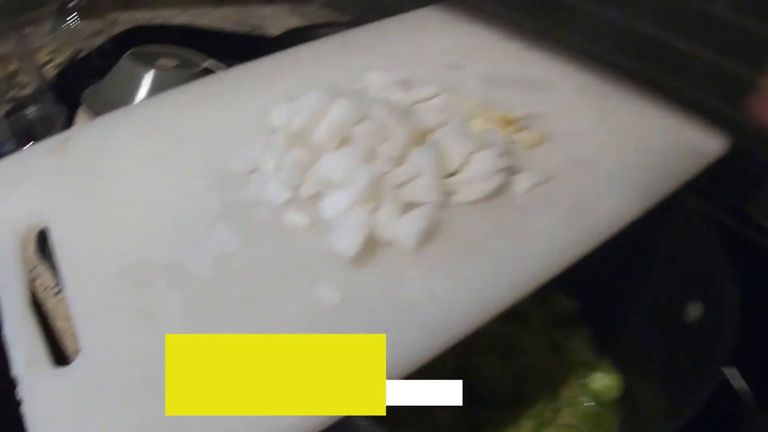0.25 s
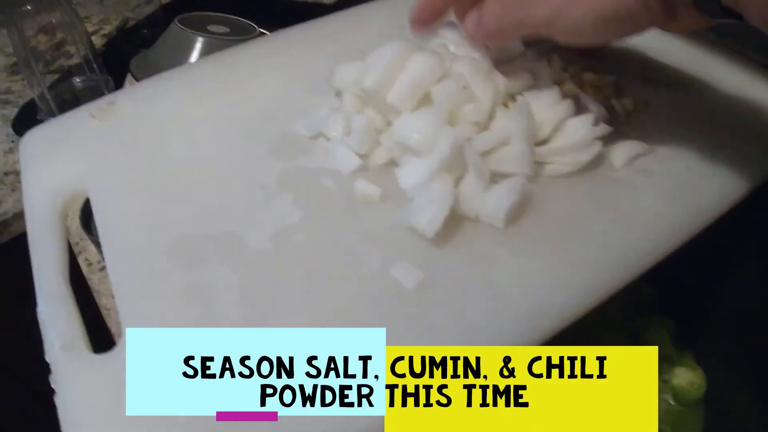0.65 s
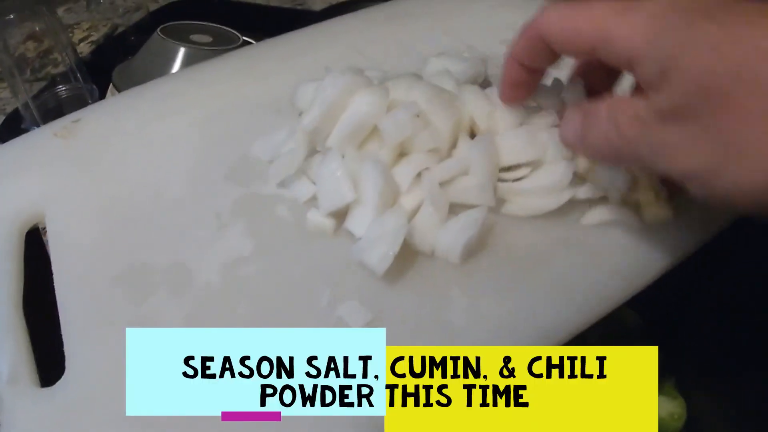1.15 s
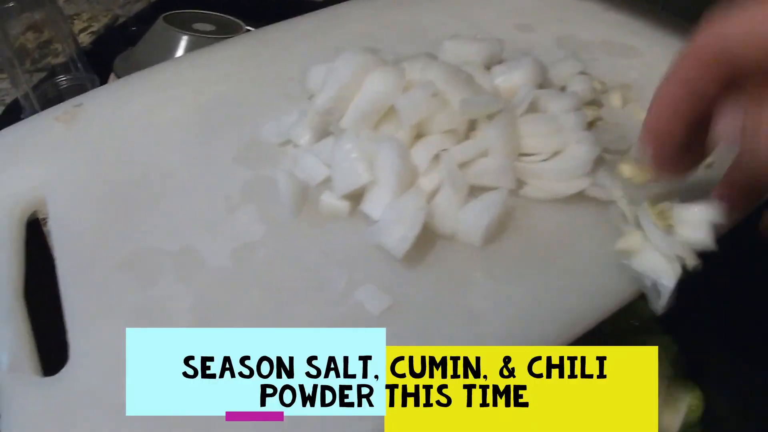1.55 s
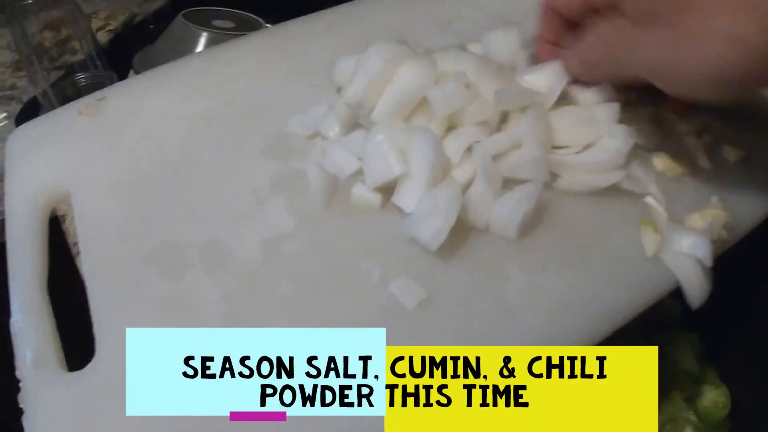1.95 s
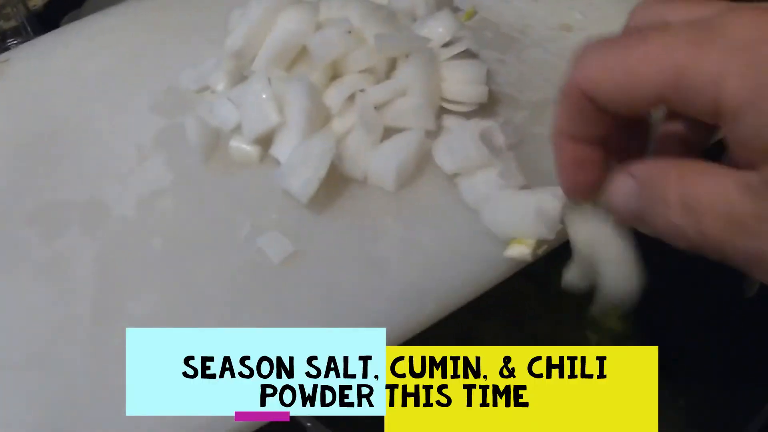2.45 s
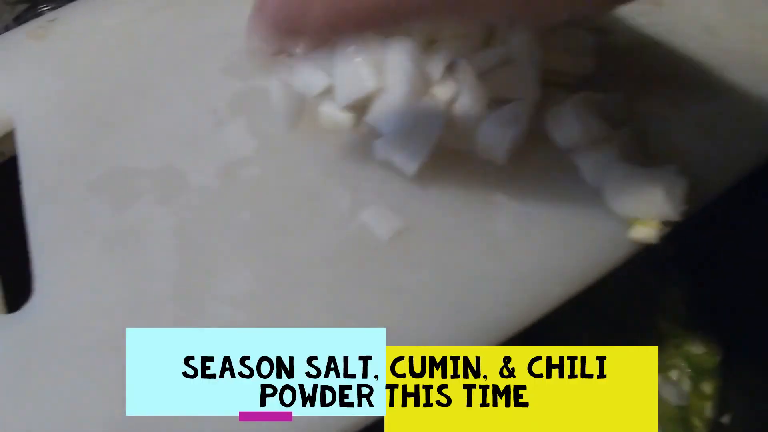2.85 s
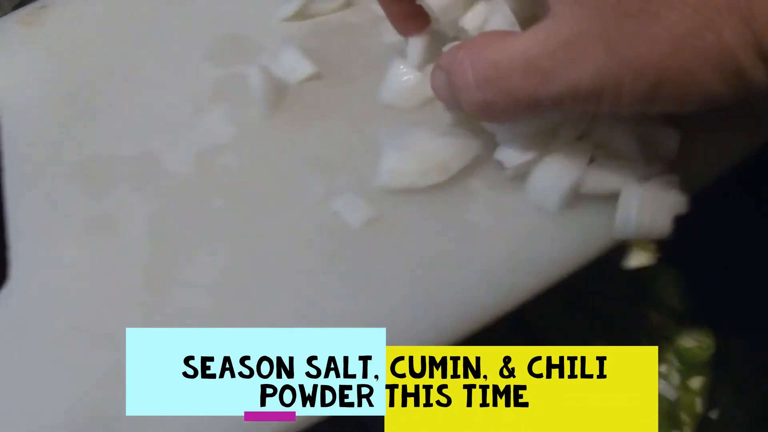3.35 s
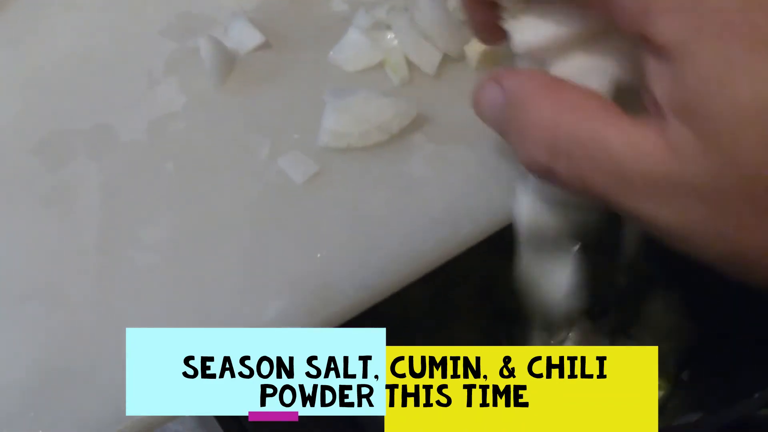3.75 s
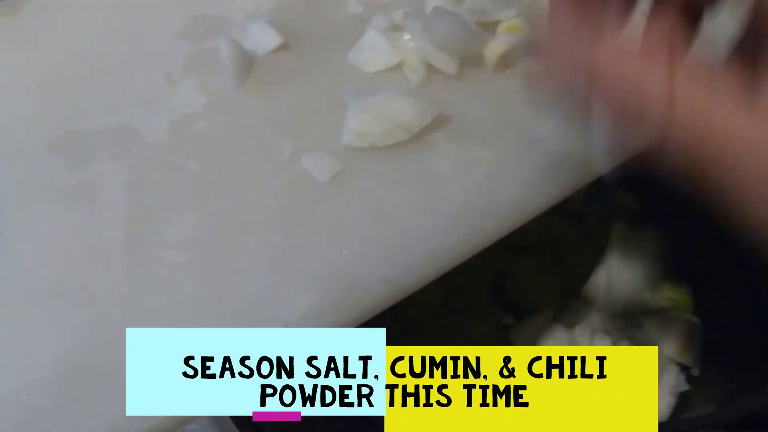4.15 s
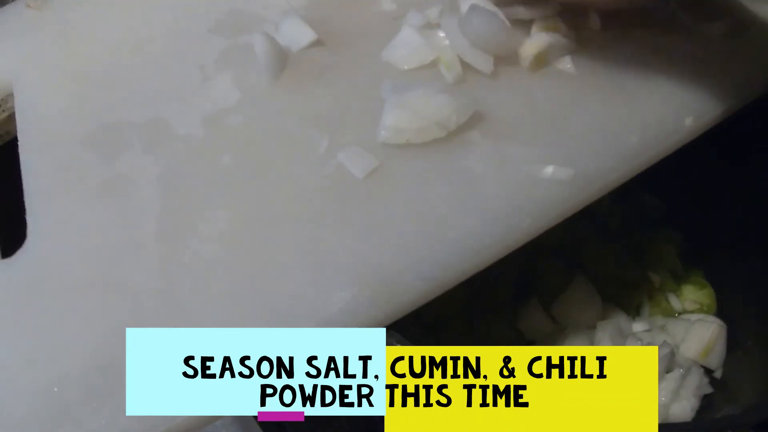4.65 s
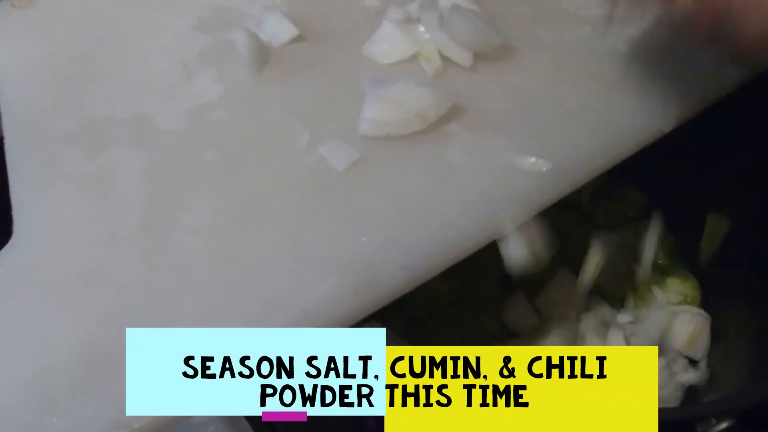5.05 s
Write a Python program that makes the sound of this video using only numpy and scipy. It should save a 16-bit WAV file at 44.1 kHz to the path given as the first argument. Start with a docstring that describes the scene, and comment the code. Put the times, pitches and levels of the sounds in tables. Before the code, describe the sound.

Hollow plastic scrapes and knocks, wet pieces plopping onto vegetables in a steel pot, a faint ping, then a loud rubbing groan.

```python
"""A plastic cutting board drones as chopped onion and garlic are pushed off it by hand into a steel pot:
random slips and shoves excite its resonances, and two rubs of the hand add a gliding groan and squeak.
Clumps plop on the vegetables below (noise bursts through pot resonances), wet faces tick apart,
and a few pieces ping on the bare pot wall (decaying sines). Fingertips tap the plastic;
a small kitchen adds reflections, soft room noise and a low hum."""
import sys
import numpy as np
from scipy import signal
from scipy.fft import rfft, irfft, next_fast_len
from scipy.io import wavfile
from scipy.ndimage import uniform_filter1d

SR = 44100
rng = np.random.default_rng(int(sys.argv[2]) if len(sys.argv) > 2 else 0)


def unload_audio(sound):
    """Save the sound as a 16-bit wav file, at the path given as the first command line argument."""
    columns = np.transpose(np.atleast_2d(sound))
    # keep every value between -1 and 1, then stretch to whole-number steps
    steps = np.round(np.clip(columns, -1, 1) * 32767)
    wavfile.write(sys.argv[1], SR, steps.astype(np.int16))


N = 233156
TIME_S = np.arange(N) / SR

# whole board flexing in the hand: centre_hz, width_hz, level_db
FLEX_MODES = [(85, 150, -3.5), (124.1, 4, 8.5), (155, 3.3, 18), (190.5, 9.6, 7.5)]
# stiffer bending resonances of the board: centre_hz, width_hz, level_db
UPPER_MODES = [(342, 62, 22.5), (399, 20, 25), (440.6, 48, 25), (524, 17, 12), (863.5, 21.5, 27.5),
               (1235, 37, 9), (1260, 230, 2), (2000, 1500, -13), (2700, 1100, -36)]
# spectrum of the juice film's hiss: frequency_hz, density_db_per_hz
WET_SPECTRUM = [(300, -33.5), (700, -1.5), (1100, -8.5), (2000, 0), (4000, 0.5), (4900, -5), (6100, -2),
                (7200, -10), (10000, -12), (11200, -26.5), (14000, -28), (15500, -45)]
# spectrum of splashes and juice spray: frequency_hz, density_db_per_hz
SPLASH_SPECTRUM = [(800, -47), (2500, -1.5), (4500, 2.5), (6200, 4.5), (7500, -4), (10000, -8.5),
                   (12000, -22), (15000, -30)]


def from_db(db):
    """Decibels to gain."""
    return 10 ** (np.asarray(db) / 20)


def rms_one(x):
    """Scale to rms 1."""
    return x / np.sqrt(np.mean(x ** 2) + 1e-20)


def envelope(x, size):
    """Running rms over size samples."""
    return np.sqrt(np.abs(uniform_filter1d(x ** 2, size)) + 1e-14)


def even(x):
    """Hold the level at 1 and keep the fast grain."""
    return x / envelope(x, size=2200)


def colour(x, spectrum):
    """Filter by (Hz, dB) points, interpolated over log frequency."""
    hz, db = np.transpose(spectrum)
    size = next_fast_len(len(x))
    bins_hz = np.maximum(np.arange(size // 2 + 1) * SR / size, 1)
    gain = from_db(np.interp(np.log(bins_hz), np.log(hz), db))
    return irfft(rfft(x, size) * gain, size)[:len(x)]


def resonate(x, hz, width_hz):
    """Two-pole resonance with gain 1 on top."""
    r = np.exp(-np.pi * width_hz / SR)
    zeros = np.array([1, 0, -1]) * (1 - r * r) / 2
    poles = [1, -2 * r * np.cos(2 * np.pi * hz / SR), r * r]
    return signal.lfilter(zeros, poles, x + 1e-18)


def body(x, modes, scatter_db=0):
    """Parallel resonances; the place of contact changes their strengths by scatter_db."""
    return sum(from_db(db + scatter_db * rng.normal()) * resonate(x, hz, width_hz)
               for hz, width_hz, db in modes)


def soften(x, hz):
    """Second-order low-pass."""
    return signal.sosfilt(signal.butter(2, min(hz, SR / 2 - 1000), fs=SR, output="sos"), x)


def drift(hz):
    """Random wavering below about hz, with rms 1."""
    return rms_one(soften(rng.standard_normal(N + SR), hz)[SR:])


def glide(x, ratio):
    """Raise or lower a steady texture's pitch by a moving ratio."""
    return np.interp(np.cumsum(ratio) % N, np.arange(N), x)


def grains(per_s, spread_db, size=N):
    """Tiny slips at random moments, a few much stronger than the rest."""
    strength = from_db(spread_db * np.minimum(rng.exponential(1, size), 4))
    happens = rng.random(size) < per_s / SR
    return happens * strength * rng.choice([-1, 1], size)


def gate(start_s, end_s, rise_s, fall_s):
    """Full level from start to end, rising exponentially before and dying away after."""
    rise, fall = (TIME_S - start_s) / rise_s, (end_s - TIME_S) / fall_s
    return np.exp(np.minimum(0, np.minimum(rise, fall)))


def add(track, s, sound, db):
    """Mix in a short sound at time s, its highest 5 ms rms at db."""
    start = round(s * SR)
    sound = from_db(db) * sound / envelope(sound, size=220).max()
    track[start:start + len(sound)] += sound[:N - start]


def background():
    """Room tone is coloured noise; the low hum is a sine plus narrow-band noise, so it wavers."""
    # room noise spectrum: frequency_hz, density_db_per_hz
    room_tone = [(15, -3), (28, -1), (50, -5), (80, -17), (150, -4), (250, -5), (420, -17), (1000, -23.5),
                 (2200, -23.3), (4000, -25.3), (6200, -24.3), (9000, -33), (11500, -48), (15000, -64)]
    room_rms_db, hum_rms_db, hum_hz = -53.8, -56, 50.1
    room = rms_one(colour(rng.standard_normal(N), room_tone))
    waver = rms_one(resonate(rng.standard_normal(N), hum_hz, width_hz=6.8))
    hum = rms_one(np.sin(2 * np.pi * hum_hz * TIME_S) + 0.52 * waver)
    return from_db(room_rms_db) * room + from_db(hum_rms_db) * hum


def taps():
    """A soft fingertip brushes the plastic: a short, dull noise band plus the board's flexing."""
    # fingertip taps: start_s, level_db, pitch_hz, decay_s
    touches = [(0.374, -50, 1150, 0.03), (0.731, -43.5, 880, 0.02), (1.421, -31, 470, 0.006),
               (1.841, -37, 890, 0.003), (1.99, -34, 1400, 0.012), (1.992, -33, 500, 0.04),
               (4.476, -49, 833, 0.0092), (4.657, -33, 500, .016), (5.135, -43, 380, .025)]
    out, age_s = np.zeros(N), TIME_S[:SR // 5]
    for s, db, hz, decay_s in touches:
        shape = np.exp(-age_s / decay_s) * (1 - np.exp(-age_s / 0.0013))
        touch = shape * rng.standard_normal(len(age_s))
        add(out, s, soften(resonate(touch, hz, width_hz=.7 * hz), hz), db)
        add(out, s, soften(body(touch, FLEX_MODES), hz=400), db - 7)
    return out


def slide_gains():
    """Along each push the drone starts a little strong and settles, the juice film thins and the rumble grows
    toward the edge."""
    # pushes: start_s, end_s, drone_db, start_hiss_db, start_fizz_db, end_rumble_db (before the mix gains)
    slides = [(0.968, 1.368, -47.5, -63.5, -72, -71), (1.448, 1.54, -51.5, -68, -83, -71),
              (1.841, 1.99, -44, -69, -62.5, -58), (2.149, 2.268, -45.5, -80, -49.5, -57),
              (2.313, 2.44, -45, -98, -63.5, -47.5), (2.54, 2.632, -54, -66.5, -80, -48),
              (3.155, 3.227, -47.5, -58.5, -59, -67), (3.269, 3.448, -42, -61, -65, -50),
              (3.549, 3.942, -44, -63, -61.5, -38), (4.027, 4.235, -52.5, -65, -79, -34.5)]
    gather_s, gather_db = 0.021, -2  # negative: the drone starts 2 dB up and settles
    gather_s, gather_db = 0.021, -2
    fade_db_per_s, growth_db_per_s = 1.5, 41
    total = 0
    for start_s, end_s, drone_db, hiss_db, fizz_db, rumble_db in slides:
        age_s = np.clip(TIME_S, start_s, end_s) - start_s
        levels_db = [drone_db - gather_db * np.exp(-age_s / gather_s),
                     hiss_db - fade_db_per_s * age_s,
                     fizz_db - fade_db_per_s * age_s,
                     rumble_db - growth_db_per_s * (end_s - start_s - age_s)]
        total = total + gate(start_s, end_s, rise_s=0.038, fall_s=0.045) * from_db(levels_db)
    return total


def board_low(x, edge_hz):
    """Soft contacts reach only the board's low resonances."""
    # board resonances: centre_hz, width_hz, level_db
    board = [(173, 46, -14), (260, 20, 15), (278, 12, 21), (342, 69, 2), (452, 40, 7)]
    return soften(soften(body(x, board), edge_hz), edge_hz)


def board_drone(ratio):
    """Dense slips keep the board sounding; hand pressure bends its pitch by a ratio."""
    return even(glide(board_low(grains(per_s=2500, spread_db=6.0), edge_hz=554), ratio))


def sliding():
    """The heap slides in small jerks: the board drones and rumbles, and the film of juice crackles."""
    # overtones that sliding pieces wake in the board: centre_hz, width_hz, level_db
    slide_tones = [(365, 60, 0), (480, 50, -1), (885, 35, -9), (1380, 55, -17)]
    drone_gain, hiss_gain, fizz_gain, rumble_gain = slide_gains()
    low = board_drone(1 + .07 * drift(hz=12)) * from_db(2 * drift(hz=24.0))
    overtone = rms_one(body(grains(per_s=900, spread_db=4), slide_tones))
    handling = even(soften(body(rng.standard_normal(N), FLEX_MODES), hz=223))
    crackle = even(colour(grains(per_s=9000, spread_db=4.2), WET_SPECTRUM))
    crackle = crackle * from_db(1.7 * drift(hz=13))
    spray = even(colour(grains(per_s=5000, spread_db=3.5), SPLASH_SPECTRUM))
    spray = spray * from_db(2 * drift(hz=5.5))
    drone = drone_gain * (low + from_db(-9.5) * overtone)
    rumble = from_db(-4.5) * rumble_gain * handling
    hiss = from_db(5.5) * hiss_gain * crackle
    return drone + rumble + hiss + fizz_gain * spray


def knocks():
    """A shove swings the board, its pitch sagging until the wet heap damps it; weight gives a thud."""
    # shoves by fingers and clumps: start_s, level_db, mid_sag_pitch_hz, decay_s
    shoves = [(0.985, -44, 298, 0.041), (1.099, -44.5, 318, 0.051), (1.158, -41.5, 289, 0.057),
              (1.298, -36, 268, 0.041), (1.422, -26, 294, 0.013), (1.459, -38, 286, 0.026),
              (1.486, -33.5, 288, 0.031), (1.601, -40, 291, 0.017), (1.652, -39.5, 303, 0.024),
              (1.724, -30, 286, 0.026), (1.843, -30.5, 287, 0.015), (1.887, -28.5, 269, 0.024),
              (2.272, -28, 267.5, 0.043), (2.514, -36.5, 285, 0.017), (2.556, -31.5, 280, 0.019),
              (2.67, -41.5, 285.5, 0.028), (2.803, -37, 276, 0.015), (3.335, -33, 327, 0.0058),
              (3.41, -28.5, 269.6, 0.025), (3.564, -39, 265, 0.033), (3.658, -33, 263, 0.024),
              (3.733, -27, 263.3, 0.065), (3.849, -31.5, 266.6, 0.042), (3.905, -29, 271, 0.04),
              (3.976, -33, 270, 0.017), (4.051, -27, 268, 0.018), (4.08, -25.5, 270, 0.022),
              (4.129, -26.5, 284, 0.023), (4.184, -20, 282.6, 0.014), (4.341, -40.5, 283, 0.022),
              (5.088, -41, 257, 0.067)]
    # the hand's weight comes down on the board: start_s, level_db
    weights = [(1.962, -32), (2.716, -36), (3.76, -34), (4.141, -35), (4.663, -26.5), (4.707, -33.5),
               (5.137, -38.5)]
    sag, fade_power = .09, 1.6  # pitch sag as a share; how abruptly the swing dies
    clack_db, thud_db = -16, -18.5
    out, age_s = np.zeros(N), TIME_S[:SR // 5]
    push = signal.unit_impulse(len(age_s))
    thud = soften(body(push, FLEX_MODES), hz=232)
    for s, db, hz, decay_s in shoves:
        spent = age_s / max(decay_s, .005)
        phase = 2 * np.pi * np.cumsum(hz * (1 + sag * (np.exp(-spent) - .5))) / SR
        swing = np.exp(-spent ** fade_power) * (1 - np.exp(-age_s / 0.0024)) * np.sin(phase)
        clack = soften(body(push, UPPER_MODES, scatter_db=3), hz=480)
        add(out, s, rms_one(swing) + from_db(clack_db) * rms_one(clack), db)
        add(out, s, thud, db + thud_db)
    for s, db in weights:
        add(out, s, thud, db)
    return out


def ticks():
    """A film of juice breaks as wet faces snap apart, and a firm piece cracks on the steel wall at 1.777 s: a
    short, bright spit of band-passed grains."""
    # snaps: start_s, level_db, pitch_hz (the row at 1.777 s is the crack of a piece hitting the steel)
    snaps = [(1.14, -48, 5500), (1.211, -50.5, 5800), (1.304, -45.5, 5900), (1.477, -51.5, 5760),
             (1.645, -63, 5400), (1.777, -36, 5000), (1.982, -52, 6700), (2.061, -49.5, 5230),
             (2.391, -42, 3180), (2.5, -49, 3040), (2.534, -47, 5100), (2.555, -53, 3800),
             (2.74, -48, 3720), (3.103, -55, 6700), (3.307, -64, 3220), (3.614, -48, 4000),
             (3.662, -44.5, 3630), (4.051, -44.5, 6030), (4.067, -40.5, 3560), (4.095, -48, 7600),
             (4.194, -49.5, 8000), (4.342, -41, 5300), (4.692, -47, 5700)]
    decay_s, width_share = 0.01, 0.22  # bandwidth as a share of pitch
    out, age_s = np.zeros(N), TIME_S[:SR // 10]
    for s, db, hz in snaps:
        spit = np.exp(-age_s / decay_s) * grains(per_s=16000, spread_db=2, size=len(age_s))
        add(out, s, soften(resonate(spit, hz, width_hz=width_share * hz), hz=1.15 * hz), db)
    return out


def squash(decay_s, per_s):
    """A soft piece meets the heap gradually and flattens in a lumpy burst of small contacts."""
    attack_s = 0.0045
    age_s = TIME_S[:SR // 5]
    lumps = from_db(1.4 * rms_one(soften(rng.standard_normal(len(age_s)), hz=160)))
    shape = np.exp(-age_s / max(decay_s, .001)) * (1 - np.exp(-age_s / attack_s)) ** 2
    return shape * lumps * grains(per_s, spread_db=3.0, size=len(age_s))


def plops():
    """Each landing piece, and one wet squish at 1.274 s, gives its own dull note, the pot's hollow and a wet
    splash."""
    # larger pieces and clumps, plus one wet squish at 1.274 s: start_s, level_db (before plop_db), pitch_hz,
    # splash_db, decay_s
    pieces = [(1.274, -49, 5540, -46.5, 0.01), (1.64, -45, 1870, -50, 0.0043),
              (1.66, -35.5, 890, -55, 0.0035), (1.677, -44.5, 1900, -65, 0.0056),
              (1.724, -33, 1900, -47.5, 0.0059), (1.883, -34.5, 1750, -43, 0.0024),
              (1.924, -36, 2900, -46, 0.001), (2.009, -37, 875, -43.5, 0.0038),
              (2.388, -28, 1880, -47, 0.0014), (2.442, -41.5, 876, -67, 0.0045),
              (2.451, -37.5, 2140, -58, 0.0025), (2.47, -35.5, 1960, -48, 0.0039),
              (2.509, -33.5, 950, -55, 0.0027), (2.516, -37, 2560, -65, 0.0039),
              (2.552, -38.5, 860, -48, 0.0032), (2.573, -42, 1850, -69, 0.003),
              (2.662, -41.5, 2020, -47, 0.0063), (2.704, -36.5, 1900, -53, 0.0039),
              (2.713, -36.5, 1900, -47, 0.0041), (2.783, -33, 880, -54.5, 0.0092),
              (3.328, -38, 1750, -67, 0.0012), (3.664, -43.5, 870, -49.5, 0.0033),
              (3.849, -40, 880, -48.5, 0.01), (3.87, -31.5, 970, -52, 0.0062),
              (3.886, -41.5, 2310, -52, 0.0099), (3.972, -43.5, 930, -55.5, 0.0053),
              (4.004, -35.5, 1470, -58, 0.004), (4.019, -35.5, 1900, -52, 0.0045),
              (4.063, -36.5, 960, -44.5, 0.0051), (4.082, -36.5, 935, -60, 0.0061),
              (4.123, -34.5, 950, -36.5, 0.0079), (4.133, -27, 2130, -53, 0.0017),
              (4.19, -42.5, 880, -45.5, 0.013), (4.221, -39, 900, -47.5, 0.0087),
              (4.251, -41.5, 904, -51.5, 0.0044), (4.319, -43.5, 950, -51, 0.0023),
              (4.339, -43, 1860, -43.5, 0.0035), (4.375, -50, 1850, -57, 0.0041),
              (5.11, -41.5, 886, -52.5, 0.016), (5.129, -33.5, 2360, -54, 0.014),
              (5.182, -34, 880, -47.5, 0.0064), (5.197, -36, 2360, -48.5, 0.0086),
              (5.241, -41, 2350, -59, 0.0058)]
    # hollow resonances of the filled pot: centre_hz, width_hz, level_db
    pot = [(904, 22, 9.5), (1160, 280, -6), (1470, 100, 0), (1850, 50, 3), (2326, 160, -1),
           (2840, 200, -10), (3340, 1400, -10)]
    plop_db, shift = -3.5, 0.01  # shift: spread of the hollow's pitch with landing spot, as a share
    out = np.zeros(N)
    high_pass = signal.butter(4, 780, "high", fs=SR, output="sos")
    for s, db, hz, splash_db, decay_s in pieces:
        contacts = squash(decay_s, per_s=2500)
        note = soften(resonate(contacts, hz, width_hz=0.1 * hz), hz=1.8 * hz)
        spot = 1 + shift * rng.normal()
        modes = [(mode_hz * spot, width_hz, mode_db) for mode_hz, width_hz, mode_db in pot]
        hollow = soften(body(contacts, modes, scatter_db=4.0), hz=3420)
        plop = signal.sosfilt(high_pass, rms_one(hollow) + from_db(2.5) * rms_one(note))
        add(out, s, plop, db + plop_db)
        add(out, s, colour(squash(decay_s, per_s=16000), SPLASH_SPECTRUM), splash_db)
    return out


def pings():
    """Firm pieces set the steel wall ringing; gentler touches wake the high modes less."""
    # hits on the bare wall: start_s, level_db
    hits = [(1.7771, -29.5), (1.923, -40), (5.156, -46), (5.209, -48)]
    # ring of the steel wall: pitch_hz, level_db, t60_s
    steel = [(2379, 0, 0.17), (2930, 3, 0.05), (3030, 4, 0.04), (3560, -5, 0.1), (3984, -4, 0.05),
             (4409, 4, 0.055), (4549, 4, 0.05), (4680, 3.5, 0.045), (4935, 8, 0.03), (5290, 6, 0.05),
             (5960, -2, 0.04), (6756, -2, 0.035)]
    out, age_s = np.zeros(N), TIME_S[:SR // 3]
    hz, level_db, t60_s = np.transpose(steel)[:, :, None]
    hardest_db = max(db for s, db in hits)
    contact = 1 - np.exp(-age_s / 0.00091)
    ring = np.exp(-np.log(1000) * age_s / t60_s) * np.sin(2 * np.pi * hz * age_s)
    for s, db in hits:
        dulling_db = .55 * (db - hardest_db) * np.log2(hz / hz[0])
        strength = from_db(level_db + dulling_db + 2.5 * rng.normal(size=hz.shape))
        strength = strength * rng.choice([-1, 1], hz.shape)
        add(out, s, contact * np.sum(strength * ring, axis=0), db)
    return out


def rub_controls():
    """Groan, rasp and hiss gains, board pitch, and the hand's progress through each stroke."""
    # strokes across the board: start_s, end_s, rasp_db, hiss_db (before the mix gains)
    rubs = [(1.985, 2.3, -47.5, -83), (4.683, 5.05, -40.5, -70.5)]
    # hand pressure as the board's groan, one list per stroke: time_s, groan_db, pitch_hz
    pressures = [
        [(1.992, -38, 275), (2.04, -33, 285), (2.075, -31, 295), (2.122, -42, 275), (2.16, -35, 260),
         (2.2, -35, 250), (2.24, -45, 272), (2.3, -42, 280)],
        [(4.68, -44, 280), (4.712, -22, 283), (4.74, -34, 295), (4.78, -27, 296), (4.82, -36, 310),
         (4.85, -26, 325), (4.915, -35, 298), (4.98, -23.5, 288), (5.007, -30, 286), (5.04, -20, 276),
         (5.06, -27, 266)],
    ]
    rasp_fade_db, rasp_fade_power = 16, 3.74  # dies ever faster as the hand slows
    gains, travelled = 0, np.zeros(N)
    for (start_s, end_s, rasp_db, hiss_db), pressure in zip(rubs, pressures):
        s, groan_db, _ = np.transpose(pressure)
        progress = np.clip((TIME_S - start_s) / (end_s - start_s), 0, 1)
        levels_db = [np.interp(TIME_S, s, groan_db),
                     rasp_db - rasp_fade_db * progress ** rasp_fade_power,
                     np.full(N, hiss_db)]
        gains = gains + gate(start_s, end_s, rise_s=0.0063, fall_s=0.018) * from_db(levels_db)
        travelled = np.where(TIME_S > start_s - .5, progress, travelled)
    s, _, hz = np.concatenate(pressures).T
    return (*gains, np.interp(TIME_S, s, hz), travelled)


def rubbing():
    """Skin sticks and slips with the board: a clearing groan, relaxing plate, sinking squeak, crumbs."""
    groan_clears = 0.513  # share of roughness lost by the end of a stroke
    stiffen, stiffen_fade = 0.15, 0.3  # upper pitch raised by this share, easing over this share of a stroke
    squeak_start_hz, squeak_end_hz = 2024, 1127
    groan_gain, rasp_gain, hiss_gain, board_hz, progress = rub_controls()
    rough = 1 - groan_clears * progress
    phase = 2 * np.pi * np.cumsum(board_hz * (1 + 0.06 * rough * drift(hz=55))) / SR
    groan = even(np.sin(phase) * from_db(4 * rough * drift(hz=47.5)))
    # uneven bursts of friction, once a cycle
    slips = rms_one(from_db(2.6 * np.cos(phase) + 1.8 * drift(hz=88)))
    plate = even(soften(body(grains(per_s=900, spread_db=3.2), UPPER_MODES), hz=3600))
    plate = slips * glide(plate, 1 + stiffen * np.exp(-progress / stiffen_fade))
    squeak = resonate(grains(per_s=900, spread_db=4), squeak_start_hz, width_hz=110)
    squeak = slips * even(glide(squeak, (squeak_end_hz / squeak_start_hz) ** progress))
    squeak_db = -3.5 - 34 * (progress - .35) ** 2  # strongest a third of the way
    crunch = resonate(grains(per_s=420, spread_db=3.5), hz=1900, width_hz=1500)
    crunch = even(soften(crunch, hz=3200))
    juice = slips * rms_one(colour(rng.standard_normal(N), WET_SPECTRUM))
    friction = from_db(7.5) * plate + from_db(squeak_db) * squeak + from_db(-12) * crunch
    return groan_gain * groan + rasp_gain * friction + from_db(15.0) * hiss_gain * juice


def kitchen(x, t60_s, wet_db):
    """Dense reflections from the hob and tiled walls, thin in the bass: decaying coloured noise."""
    age_s = TIME_S[:SR // 2]
    spectrum = [(300, -8), (800, -2.5), (5000, -4.5), (12000, -7.5)]
    wash = colour(rng.standard_normal(len(age_s)), spectrum)
    tail = wash * np.exp(-np.log(1000) * age_s / t60_s) * (age_s > .004)
    return x + from_db(wet_db) * signal.fftconvolve(x, tail / np.linalg.norm(tail))[:N]


def scene():
    """Board and pot share one small room; the background is added without reflections."""
    sources = taps() + sliding() + knocks() + ticks() + plops() + pings() + rubbing()
    return (kitchen(sources, t60_s=.22, wet_db=-9) + background())[None]


def record(dry):
    """A steep elliptic low-pass cuts the top."""
    cutoff_hz = 15300
    return signal.sosfilt(signal.ellip(10, .1, 80, cutoff_hz, fs=SR, output="sos"), dry)


dry = scene()
out = record(dry)
unload_audio(out)
```